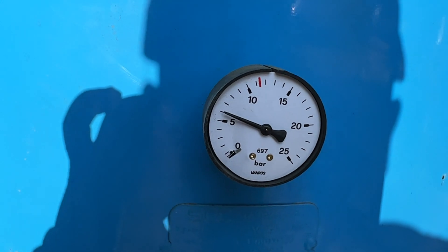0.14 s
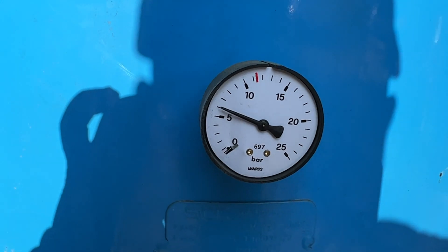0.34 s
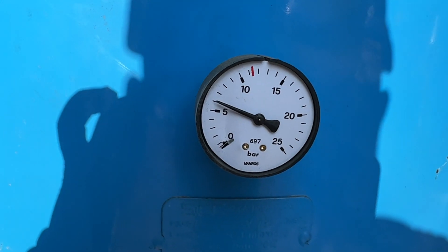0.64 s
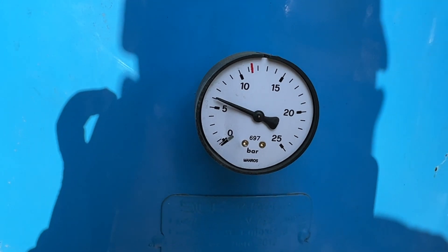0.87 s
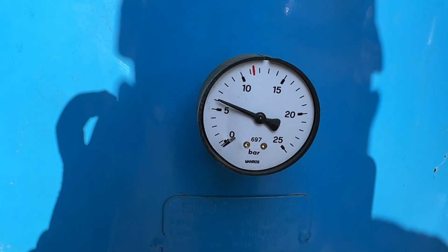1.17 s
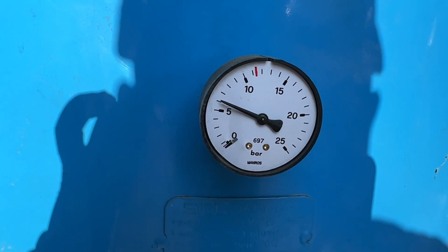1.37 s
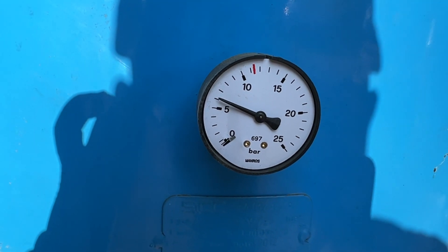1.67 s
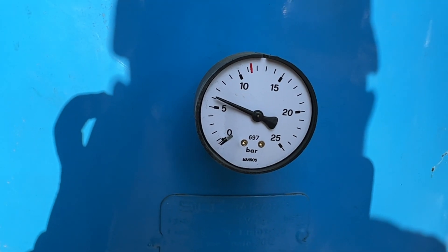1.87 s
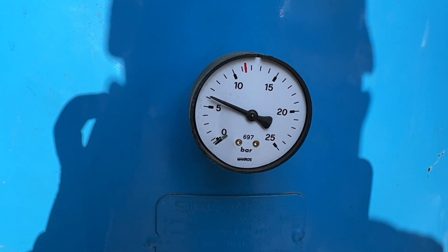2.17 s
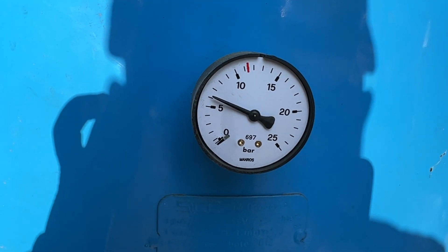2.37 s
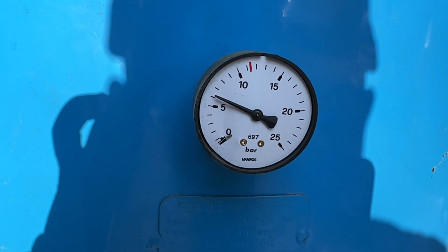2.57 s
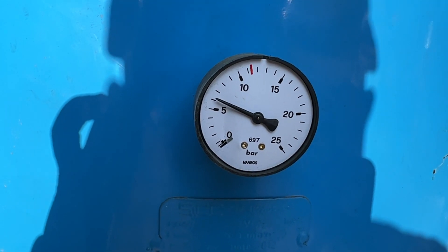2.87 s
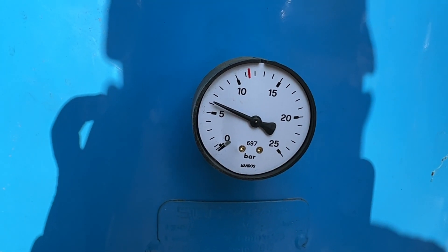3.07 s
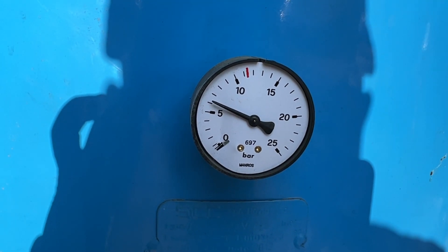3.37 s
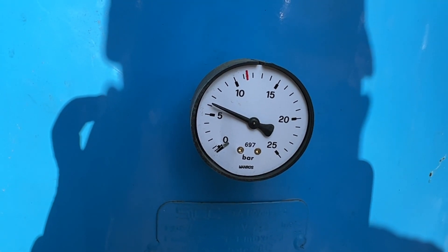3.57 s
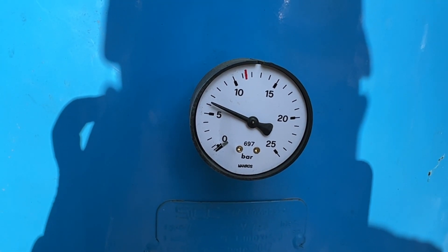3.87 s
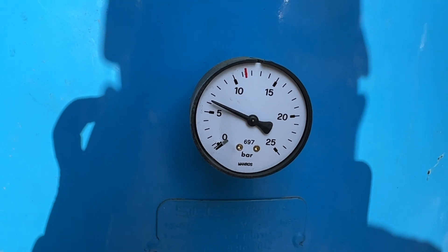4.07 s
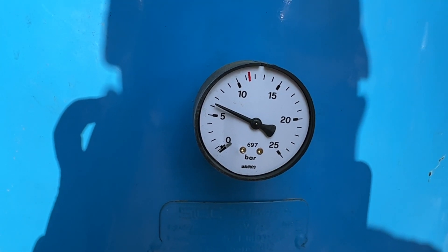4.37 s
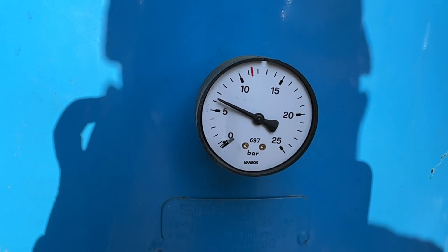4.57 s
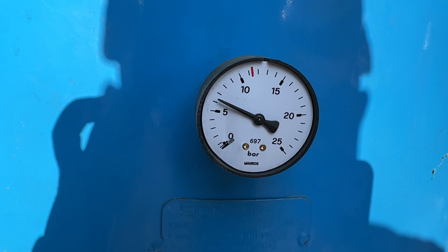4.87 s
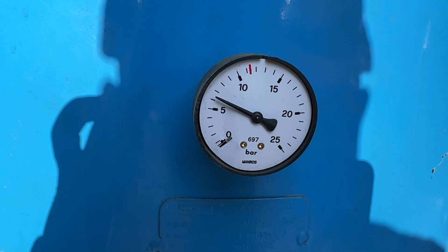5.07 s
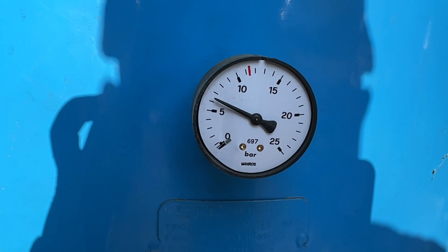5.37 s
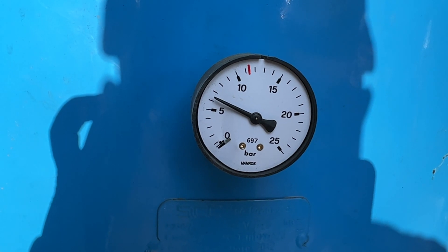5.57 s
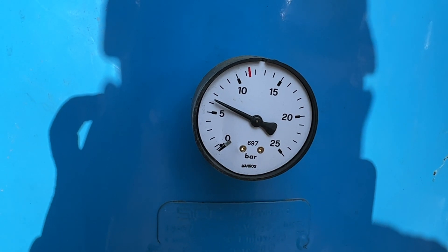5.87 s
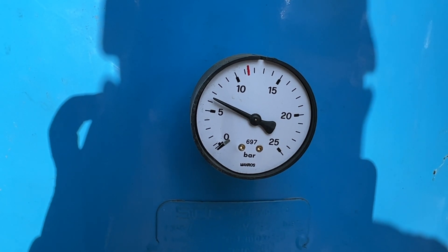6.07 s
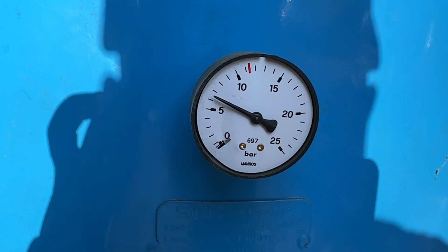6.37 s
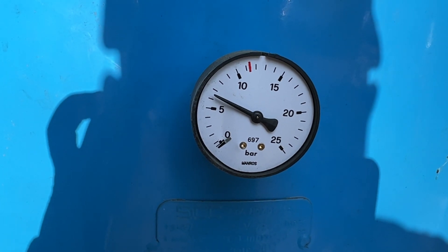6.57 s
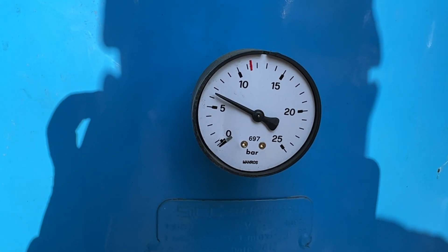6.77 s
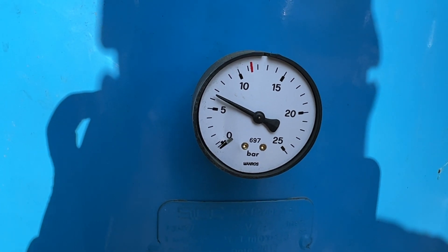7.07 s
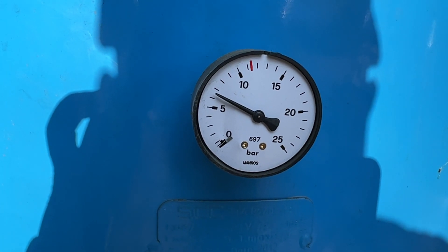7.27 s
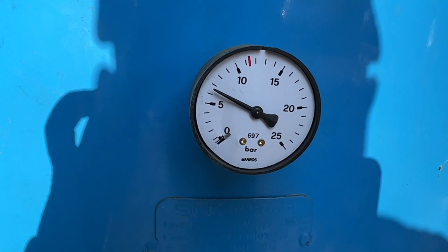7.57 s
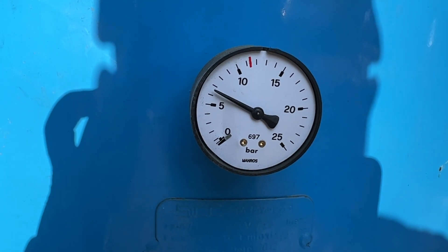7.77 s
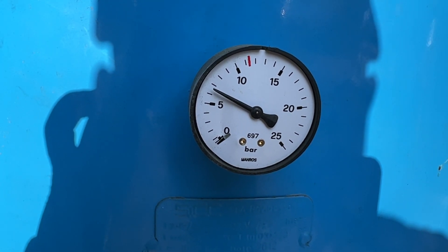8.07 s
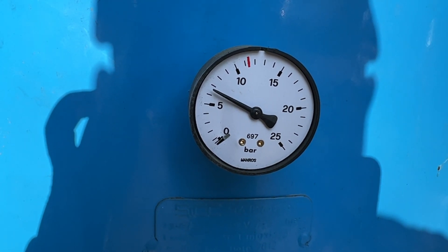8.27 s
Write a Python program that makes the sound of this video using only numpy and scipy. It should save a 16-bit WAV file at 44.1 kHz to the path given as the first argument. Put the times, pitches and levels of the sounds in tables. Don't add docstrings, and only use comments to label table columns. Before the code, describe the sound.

A large electric air compressor runs under load outdoors, heard very close in stereo. A piercing, steady gear whine sits high above a throbbing low hum and fuzzy fan rumble. Casing roar and fine air hiss fill the background. It is already running at the start and never stops; pitch holds practically constant while the whole sound slowly gets louder, with small uneven flutters in the rumble.

```python
import sys
import numpy as np
from scipy import signal
from scipy.io import wavfile
from scipy.ndimage import uniform_filter1d

SR = 44100
rng = np.random.default_rng(int(sys.argv[2]) if len(sys.argv) > 2 else 0)


def makeup_ratio(level_db):
    decades = np.asarray(level_db, float) / 20
    return 10 ** decades


def to_wav(s):
    ch = np.atleast_2d(s).T
    pcm = np.round(np.clip(ch, -1, 1) * 32767)
    wavfile.write(sys.argv[1], SR, pcm.astype(np.int16))


N = 371763

GEAR = 46 / 41
# start_s, shaft_turns_per_s
SPEED = [
    (0, 49.216),
    (2.2, 49.22),
    (3.2, 49.208),
    (5, 49.197),
    (6.3, 49.2),
    (7, 49.19),
    (8.43, 49.19),
]


def drive():
    # order (cycles per shaft turn), left_db, right_db, left_lead_rad
    mesh_twice = [(78, -67, -79, 2.2), (85, -54, -57, -2.2), (86, -65, -72, 0.5), (87, -64, -71, .8),
                  (90, -67, -76, 0.7), (92, -40, -52, 1.1), (93, -64, -71, 0.6), (95, -58, -63, 1.0),
                  (96, -63, -68, 0.4), (99, -43, -50, 0.6), (100, -64, -72, .8), (101, -62, -69, 0.6),
                  (102, -65, -77, 1.3), (106, -66, -69, 0.7)]
    mesh_thrice = [(131, -63, -68, 0.4), (136, -65, -66, 0), (138, -55, -59, 0), (139, -68, -68, -0.2),
                   (140, -69, -74, -0.3), (141, -72, -73, 0), (143, -73, -74, 0), (144, -61, -64, -0.2),
                   (145, -67, -67, -0.1), (147, -74, -74, 0), (152, -74, -75, -.3), (159, -76, -74, -0.8)]
    mesh_rest = [(7, -51, -50, .4), (46, -52, -53, -2.4), (113, -76, -72, 0.5), (184, -69, -69, -2.4),
                 (185, -77, -76, -2.6), (230, -74, -74, 1.9), (237, -74, -74, 1.7)]
    lobe_tones = [(4, -38, -31, 0.5), (8, -52, -46, -0.2), (12, -52, -54, 0.7), (16, -49, -47, 1.3),
                  (20, -47, -48, 0.8), (24, -43, -45, -0.5), (28, -51, -63, 2.0), (60, -61, -78, -0.4),
                  (64, -60, -68, -0.1), (72, -59, -66, -0.1), (76, -61, -71, -0.5), (80, -68, -81, -0.2),
                  (104, -71, -73, -1.0), (112, -69, -73, -0.3)]
    rotor_tones = [(47, -62, -65, -0.7), (74, -59, -63, 0.8), (107, -71, -75, -1.5), (122, -73, -76, -0.4),
                   (127, -75, -76, 0)]

    speed = curve(SPEED, column=1)
    turns = np.cumsum(speed) / SR
    mesh = [*mesh_twice, *mesh_thrice, *mesh_rest]
    whine = orders(mesh, speed.mean(), turns, flutter_db=0.27, flutter_hz=13, slip=0.18)
    pulses = orders([*lobe_tones, *rotor_tones], GEAR * speed.mean(), GEAR * turns,
                    flutter_db=0.54, flutter_hz=12, slip=0.34)
    return whine + pulses


def orders(rows, shaft_hz, turns, flutter_db, flutter_hz, slip):
    # pitch_hz, drift_db, midway_bulge_db
    shifts = [(441, 2, 0), (883, -2, 2), (1104, 2, 1), (1325, 0, -4), (4170, 0, -3), (4526, 2, -1),
              (4910, -5, 4.5), (6445, -7, 3), (6800, 7, -2), (7100, -3, 2)]
    shift_width = 0.025
    at_hz, drifts_db, bulges_db = np.transpose(shifts)

    out = np.zeros((2, N))
    along = np.linspace(-0.5, 0.5, N)
    levels = wander(flutter_hz, count=len(rows))
    slips = wander(flutter_hz, count=len(rows))
    for (order, left_db, right_db, lead_rad), level, late in zip(rows, levels, slips):
        near = np.exp(-((order * shaft_hz / at_hz - 1) / shift_width) ** 2)
        drift_db = near @ drifts_db * along
        bulge_db = near @ bulges_db * (1 / 3 - 3.1 * along ** 2)
        size = np.sqrt(2) * makeup_ratio(drift_db + bulge_db + flutter_db * level)
        phase = 2 * np.pi * (round(order) * turns + rng.random()) + slip * late
        out[0] += makeup_ratio(left_db) * size * np.cos(phase)
        out[1] += makeup_ratio(right_db) * size * np.cos(phase - lead_rad)
    return out


def fan():
    # pitch_hz, level_db (per Hz)
    rumble = [(30, -92), (45, -62.5), (60, -57), (85, -56), (110, -46), (130, -46.5), (160, -46),
              (185, -46.5), (200, -46), (230, -51), (262, -53.5), (310, -53.5), (370, -60.5), (520, -63.5)]
    # time_s, change_db
    gusts = [(0.95, 1), (1.23, 2.3), (1.57, -2), (1.84, 2.3), (1.99, 1), (2.25, 3), (2.46, -1),
             (3.92, -2.4), (4.19, 5), (4.91, -3), (5.21, -4), (5.5, 2.5), (5.99, 3.3), (6.77, 2.5),
             (7.01, -5), (7.55, -2.5), (8.02, 1.5), (8.18, -6)]
    # time_s, change_db
    beats = [(0.19, -14), (1.87, -3), (2.17, -18), (2.61, 5), (3.47, 0), (3.82, -7), (5.15, -12),
             (5.39, -5), (5.63, 5), (5.82, 5), (5.96, -11), (6.83, 6), (7.76, 5), (8.26, 4)]
    # pitch_hz, wavering_hz, left_db, right_db, share_of_beats (0-1)
    blades = [
        (140.9, 7, .5, -.5, 1),
        (281.6, 7, -12.5, -10.5, .3),
    ]

    def colour_db(hz):
        return read(rumble, hz) + panels_db(hz) + 10 * np.log10(1 - handover(hz))

    low = air(colour_db, patchy_db=1.0)
    core_band = signal.butter(2, [80, 270], "bandpass", fs=SR, output="sos")
    core = signal.sosfiltfilt(core_band, low)
    own_level = np.sqrt(uniform_filter1d((core ** 2).mean(axis=0), round(0.1 * SR)) + 1e-12)
    steadied = 0.61
    throb = (makeup_ratio(-24) / own_level) ** steadied * makeup_ratio(bumps_db(gusts, 0.043))
    out = low - core + core * throb

    t = np.arange(N) / SR
    beats_db = bumps_db(beats, 0.11)
    for hz, wavering_hz, left_db, right_db, share in blades:
        gust_db, late = wander(wavering_hz, count=2)
        wave = np.sqrt(2) * np.cos(2 * np.pi * hz * t + 0.81 * late)
        hum = wave * makeup_ratio(-29 + share * beats_db + 0.9 * gust_db)
        out = out + makeup_ratio([[left_db], [right_db]]) * hum
    return out


def casing():
    # pitch_hz, level_db (per Hz)
    roar = [(400, -57.5), (520, -65), (800, -64.5), (1300, -64.5), (2000, -70.5), (2800, -72.5),
            (3400, -76), (3800, -78.5), (4300, -78.5), (5300, -78.5), (5480, -85), (5650, -82.5),
            (6100, -85), (6500, -86)]
    # pitch_hz, level_db (per Hz)
    hiss = [(6500, -85.5), (7200, -88), (7600, -86.5), (8000, -86.5), (8500, -88), (9600, -90),
            (10800, -91), (11300, -90.5), (12300, -94), (14000, -97), (15300, -98.8), (15700, -98.3)]

    def colour_db(hz):
        noise_db = np.where(hz < hiss[0][0], read(roar, hz), read(hiss, hz))
        return noise_db + panels_db(hz) + 10 * np.log10(handover(hz))

    noise = air(colour_db, patchy_db=0.53)
    lobes = 4 * GEAR * np.cumsum(curve(SPEED, column=1)) / SR
    puffs = 1 + 0.038 * np.cos(2 * np.pi * lobes)
    return noise * puffs * makeup_ratio(0.13 * wander(8.0)[0])


def panels_db(hz):
    # pitch_hz, width_hz, change_db
    panels = [(50, 6, -1), (199.4, 8.5, 2.5), (243.3, 7.8, 1), (442, 6, 2.5), (3995, 40, 6), (90, 9.4, 2),
              (151, 4.2, 4), (185.5, 6.9, -2.5), (211.7, 5.2, -3.5), (266, 9.6, -2.5), (325, 23, 2),
              (417, 17, -2.5), (490, 29, 3.5), (636, 31, 3), (676, 26, -2), (740, 38, 3.5), (1220, 76, -2),
              (1385, 43, -3.5), (1940, 42, 2), (2360, 140, -2), (3500, 71, 4), (4100, 40, 0),
              (4260, 100, 3.5), (8260, 220, 2)]
    return sum(db * np.exp(-((hz - at_hz) / width_hz) ** 2) for at_hz, width_hz, db in panels)


def handover(hz, low_hz=340, high_hz=520):
    return np.clip((hz - low_hz) / (high_hz - low_hz), 1e-9, 1 - 1e-9)


def air(spectrum_db, patchy_db):
    # pitch_hz, likeness (0-1), left_lead_rad, left_minus_right_db
    ports = [(100, .995, .05, .4), (300, .93, .35, 0), (800, .74, 1.6, 2.5), (1500, .5, 1.2, 3),
             (2400, .2, .6, 4), (3000, .38, 1, 5.5), (3500, .3, .9, 7), (4800, .6, .7, 7.5),
             (5800, .3, -.3, 4), (7300, .85, -.2, 1), (9100, .86, -2.4, .3), (10300, .85, -3.2, 0),
             (12300, .72, -5.6, 0), (15700, .35, -8.6, 0)]
    hz = np.fft.rfftfreq(4096, 1 / SR)
    frames = N // 1024 + 6
    a, b, c, d, patches = rng.standard_normal((frames, len(hz), 5)).T
    patches = uniform_filter1d(uniform_filter1d(patches, size=30, axis=0), size=5, axis=1)

    like = np.clip(read(ports, hz, column=1), 0, 1)[:, None]
    left = a + 1j * b
    right = like * left + np.sqrt(1 - like ** 2) * (c + 1j * d)
    delay = np.exp(-1j * read(ports, hz, column=2))
    right = right * (delay / makeup_ratio(read(ports, hz, column=3)))[:, None]

    z = np.array([left, right])
    white = signal.istft(z[0], nperseg=4096, noverlap=3072)[1].std()
    z = z * makeup_ratio(spectrum_db(hz)[:, None] + patchy_db * patches / patches.std())
    noise = signal.istft(z, nperseg=4096, noverlap=3072)[1][:, 2048:2048 + N]
    return noise * np.sqrt(SR / 2) / white


def wander(fastest_hz, count=1):
    t = np.arange(N // 128 + 2) * 128 / SR
    hz = np.geomspace(fastest_hz / 20, fastest_hz, num=12)
    start = rng.random((count, 12, 1))
    waves = np.sin(2 * np.pi * (hz[:, None] * (1 + start / 10) * t + 7 * start))
    rows = (waves / np.sqrt(hz[:, None])).sum(axis=1)
    return [np.interp(np.arange(N) / SR, t, row / row.std()) for row in rows]


def bumps_db(rows, width_s):
    t = np.arange(N) / SR
    return sum(db * np.exp(-((t - s) / width_s) ** 2) for s, db in rows)


def curve(rows, column):
    rows = np.array(rows)
    return np.interp(np.arange(N) / SR, rows[:, 0], rows[:, column])


def read(rows, hz, column=1):
    rows = np.array(rows)
    return np.interp(np.log(hz + 1), np.log(rows[:, 0] + 1), rows[:, column])


def scene():
    return drive() + fan() + casing()


def starve(x):
    # half (0 sum, 1 difference), low_hz, high_hz, share_of_frames_lost (0-1)
    starved = [(0, 9647, 11025, 1), (0, 9300, 9647, .3), (1, 6890, 7579, .15), (0, 15159, 15730, .08),
               (1, 12403, 14470, 1), (1, 14470, 15159, .05), (0, 15730, 22050, 1), (1, 15730, 22050, 1)]
    # time_s, half (0 sum, 1 difference), low_hz, high_hz
    spared = [
        (5.59, 0, 10336, 11025),
        (5.92, 0, 9647, 10336),
        (6.13, 0, 9647, 11025),
        (6.13, 1, 13092, 14470),
    ]
    hz, t, z = signal.stft([x[0] + x[1], x[0] - x[1]], SR, nperseg=2048, noverlap=1536)
    kept = np.ones(z.shape)
    for half, low_hz, high_hz, share in starved:
        chance = np.repeat(rng.random(len(t)), repeats=3)[:len(t)]
        band = (hz >= low_hz) & (hz < high_hz)
        kept[half][band[:, None] & (chance < share)] = 0
    for s, half, low_hz, high_hz in spared:
        band = (hz >= low_hz) & (hz < high_hz)
        kept[half][band[:, None] & (abs(t - s) < 0.017)] = makeup_ratio(7.0)
    total, gap = signal.istft(z * kept, SR, nperseg=2048, noverlap=1536)[1][:, :N]
    return np.array([total + gap, total - gap]) / 2


def top_cut(x):
    return signal.sosfilt(signal.butter(12, 15950, fs=SR, output="sos"), x)


def record(dry):
    # time_s, gain_db
    gain = [(0, -5.5), (1, -4.5), (2, -3.5), (3, -1.35), (4, -0.5), (5, 1.1), (6, 2), (7, 3.5), (8.43, 3)]
    bass_cut = signal.butter(2, 34, "highpass", fs=SR, output="sos")
    cut = signal.sosfilt(bass_cut, dry)
    mix = starve(cut * makeup_ratio(curve(gain, column=1)))
    return top_cut(mix)


dry = scene()
out = record(dry)
to_wav(out)
```